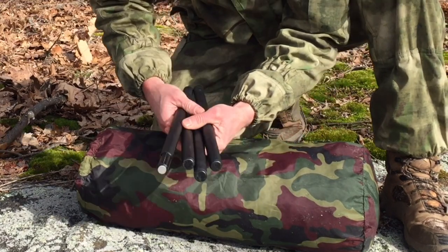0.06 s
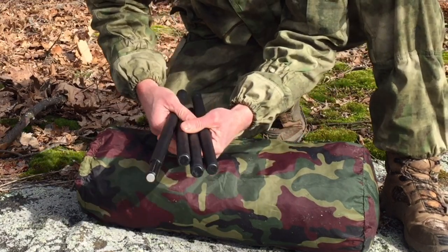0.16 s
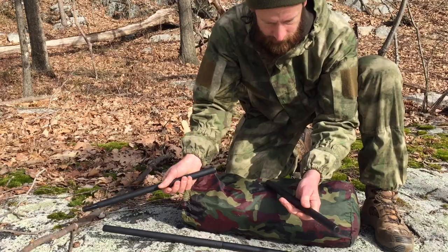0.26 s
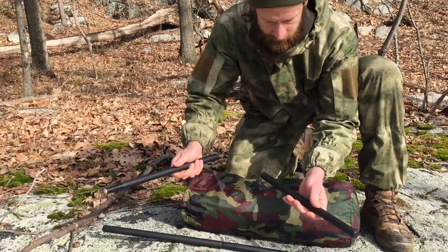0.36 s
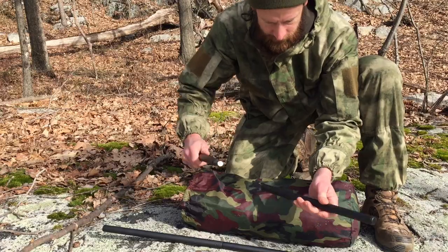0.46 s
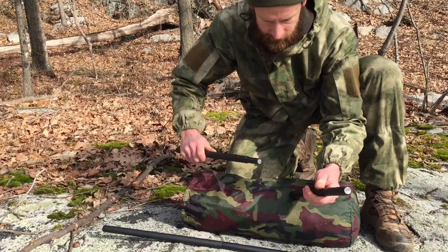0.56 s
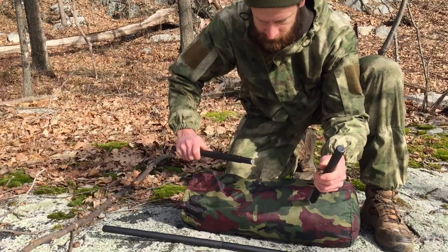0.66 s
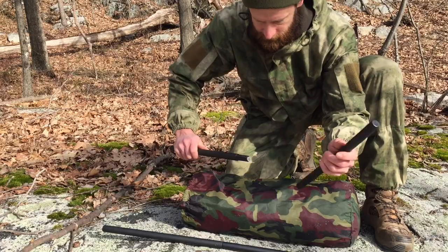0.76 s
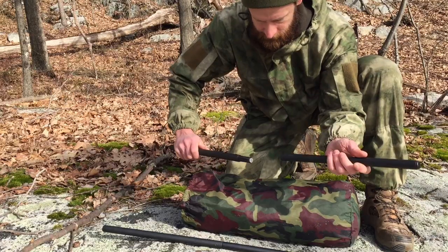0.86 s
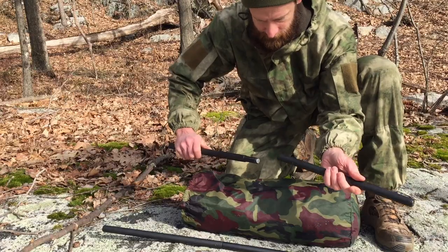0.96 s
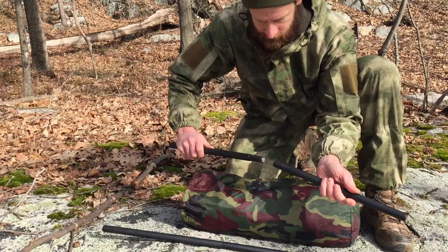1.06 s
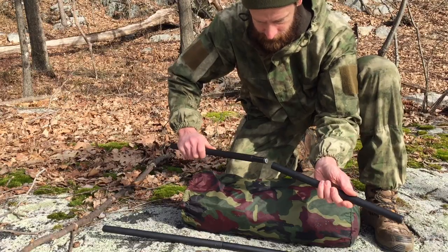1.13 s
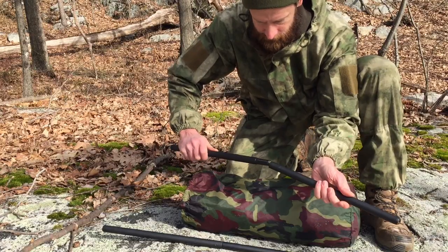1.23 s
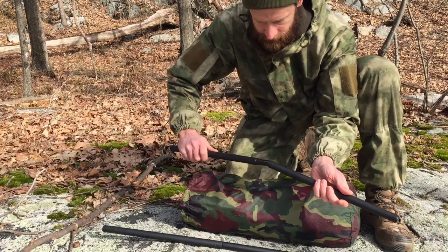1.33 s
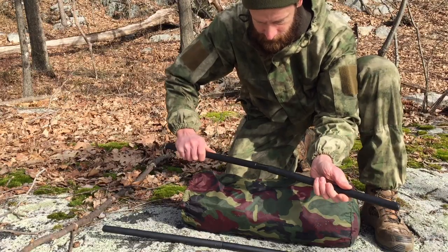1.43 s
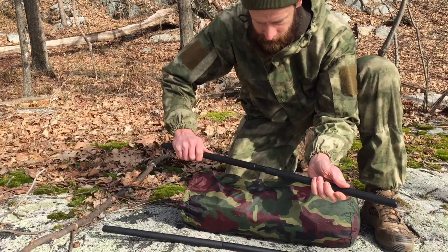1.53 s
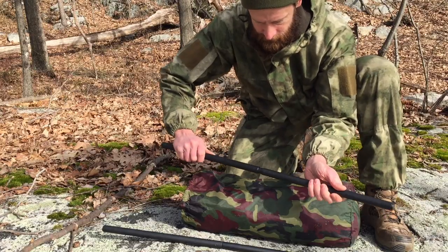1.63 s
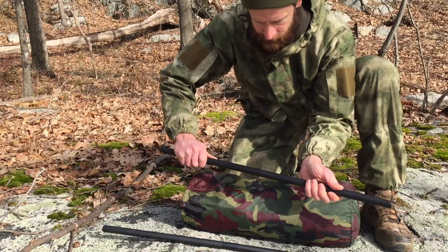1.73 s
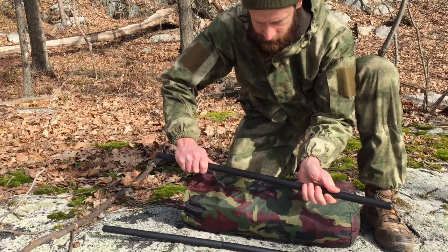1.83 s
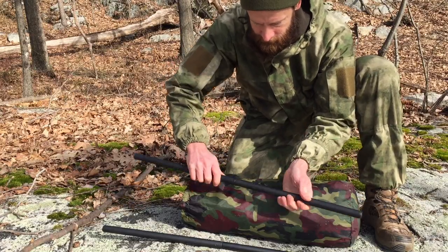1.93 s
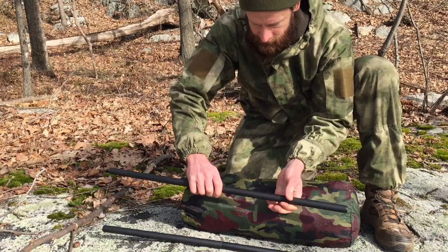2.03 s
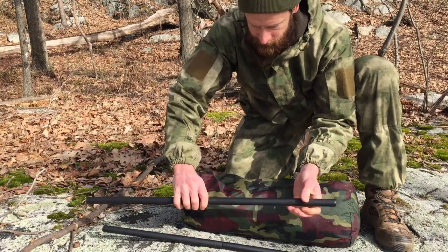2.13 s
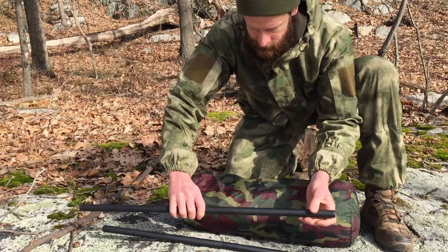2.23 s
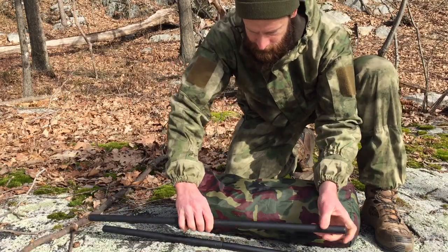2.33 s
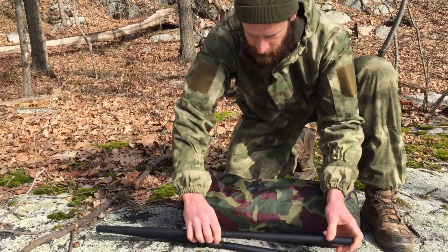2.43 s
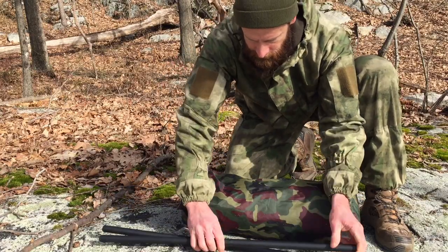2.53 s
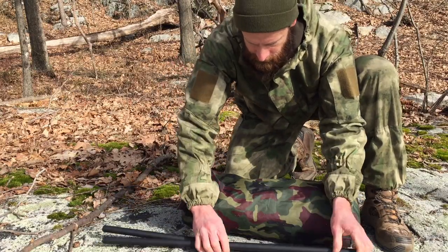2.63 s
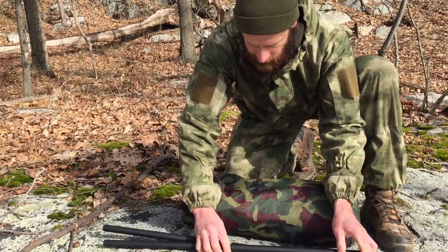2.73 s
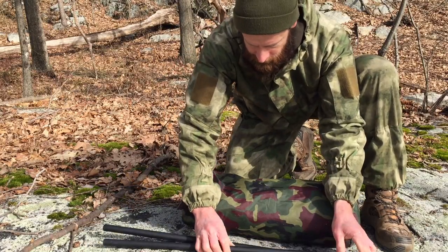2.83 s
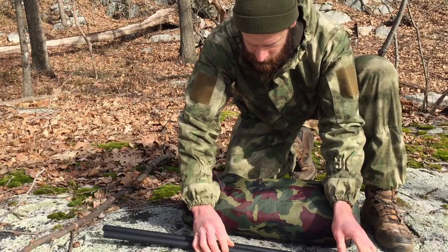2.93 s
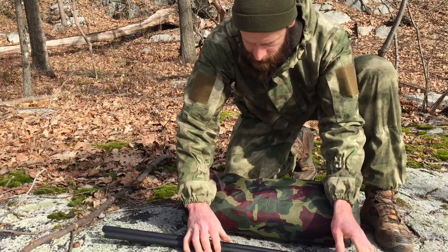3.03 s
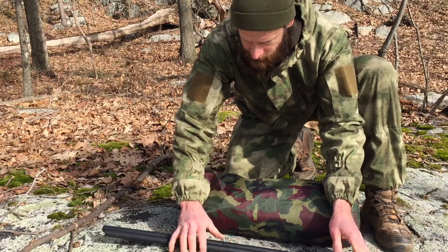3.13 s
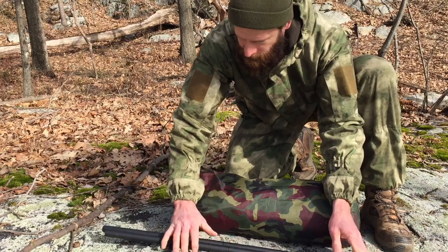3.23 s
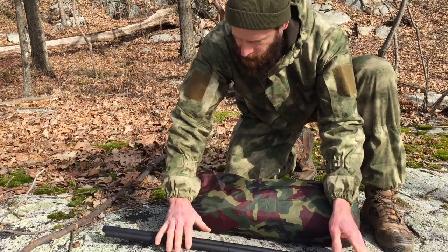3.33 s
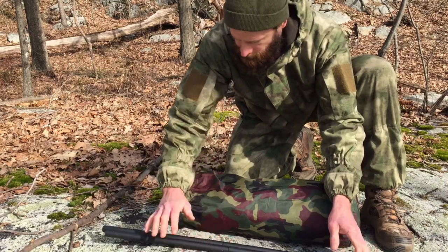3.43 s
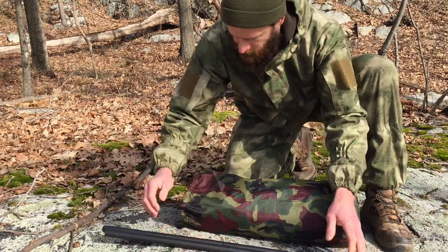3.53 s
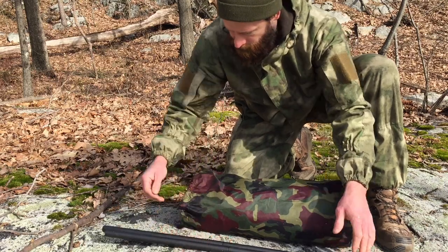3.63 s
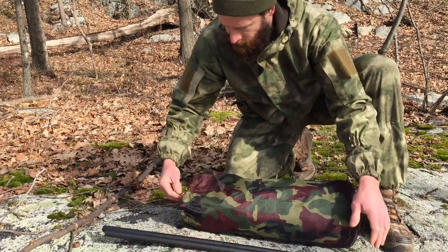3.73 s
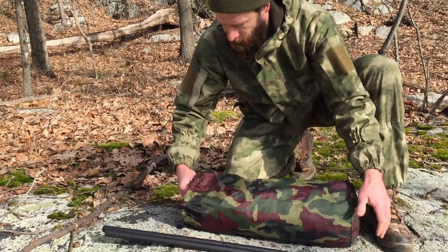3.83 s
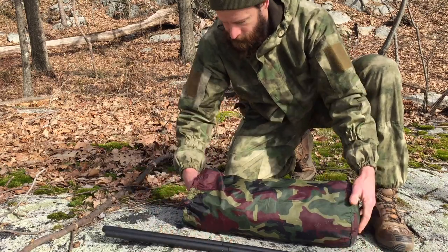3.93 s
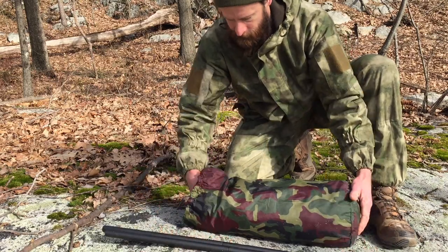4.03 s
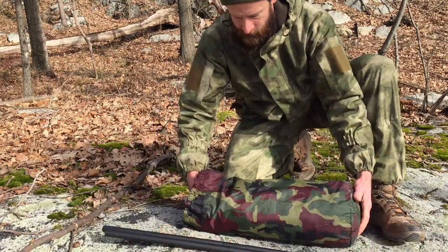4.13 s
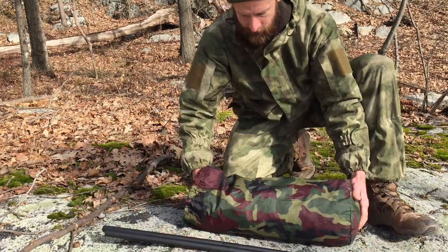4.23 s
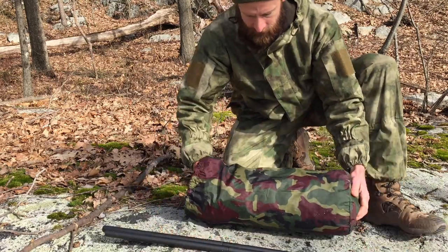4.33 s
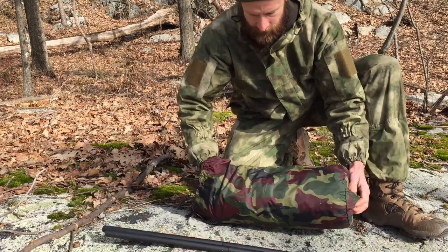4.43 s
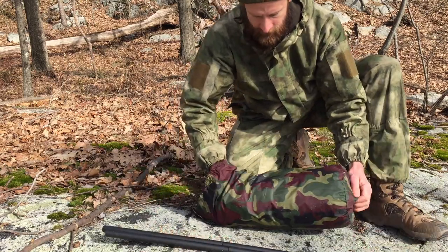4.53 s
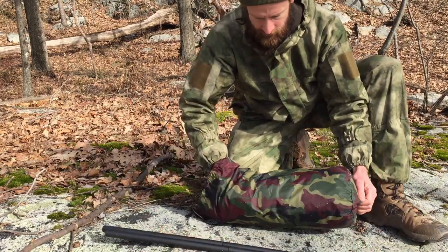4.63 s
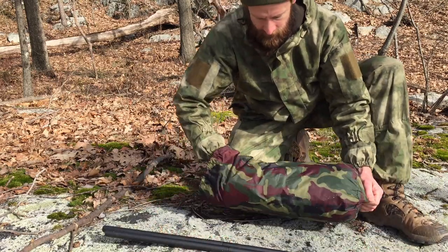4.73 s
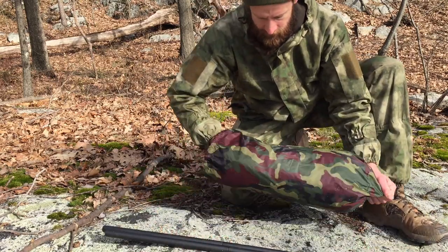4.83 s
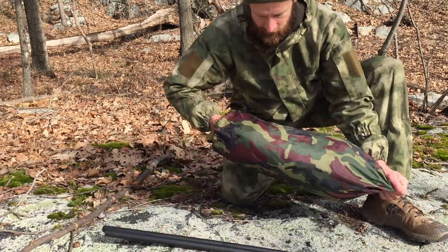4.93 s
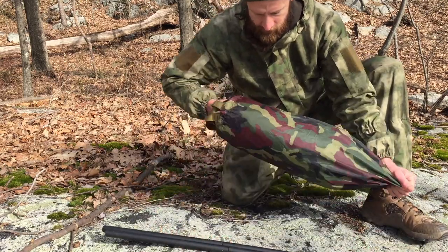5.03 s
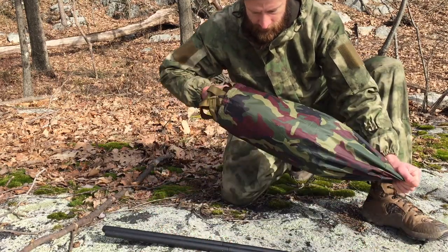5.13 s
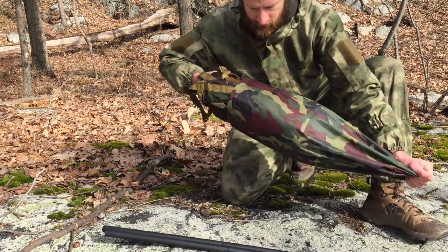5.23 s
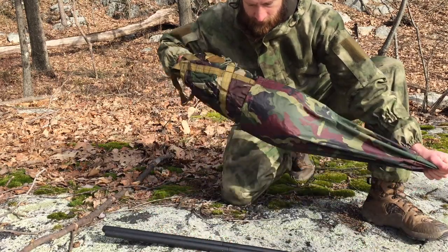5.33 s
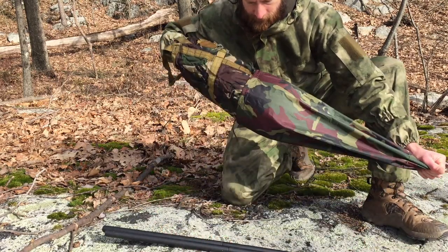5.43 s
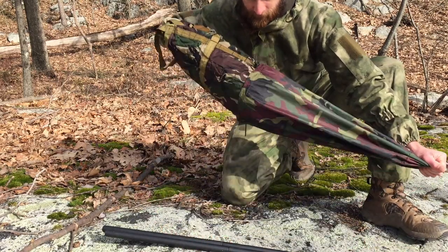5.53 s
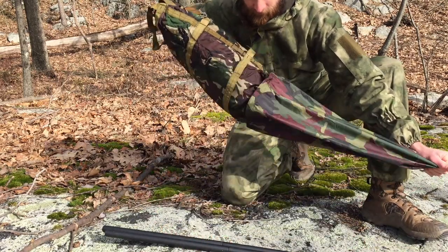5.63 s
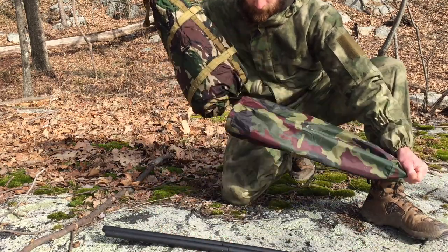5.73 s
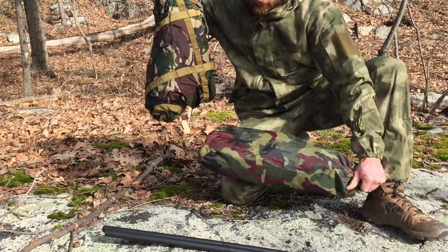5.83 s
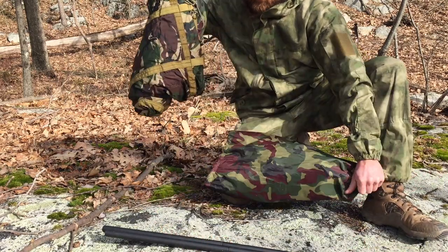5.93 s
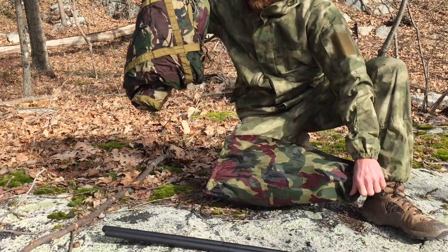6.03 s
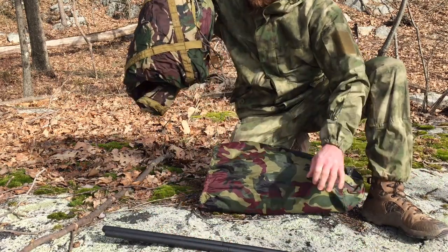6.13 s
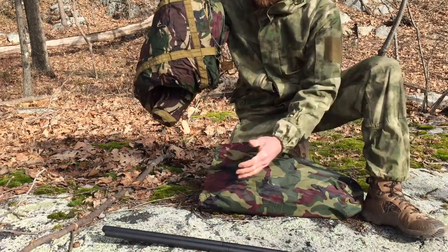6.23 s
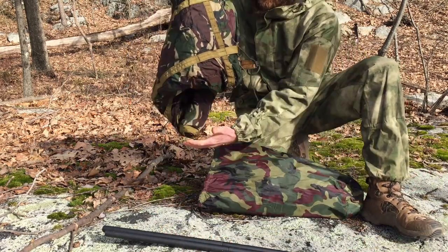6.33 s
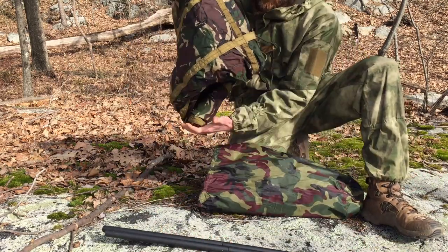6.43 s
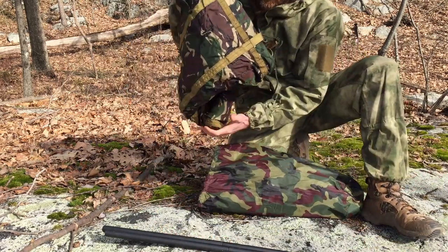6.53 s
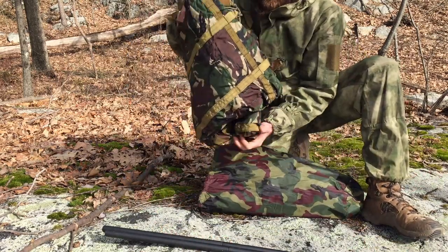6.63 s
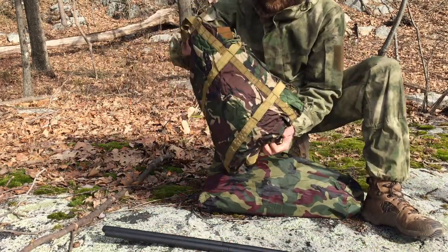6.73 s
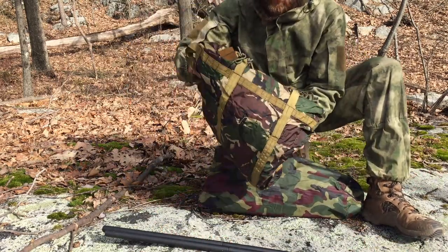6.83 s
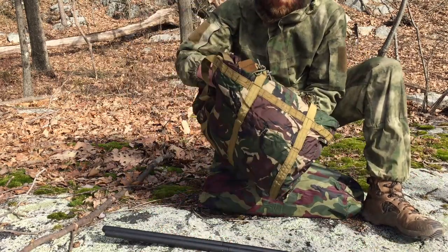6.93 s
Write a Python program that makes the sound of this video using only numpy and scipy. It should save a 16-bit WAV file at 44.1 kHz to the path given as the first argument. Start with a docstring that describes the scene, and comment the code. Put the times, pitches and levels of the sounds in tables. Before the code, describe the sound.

Close, dry clicks and scrapes of thin tubes give way to nylon rustling, a loud rasping pull and small cloth crumples.

```python
"""Outdoors on a rock slab, tent poles are gathered, slid together, snapped home and laid down.
Then hands grip a nylon stuff sack and drag a heavy hammock out of it: folds buckle and pop, the weave hisses.
Poles are damped ringing modes, struck or rubbed; cloth is many random clicks through resonances and filters.
Throughout, a low distant rumble and faint forest air lie underneath, both filtered noise.
One close microphone; the level dips briefly near the start."""
import sys
import numpy as np
from scipy import signal
from scipy.fft import rfft, irfft, next_fast_len
from scipy.io import wavfile
from scipy.ndimage import uniform_filter1d

SR = 44100
rng = np.random.default_rng(int(sys.argv[2]) if len(sys.argv) > 2 else 0)


def dump(signal):
    """Clip the signal to [-1, 1] and save it as 16-bit WAV at the path in sys.argv[1]."""
    limited = np.clip(np.atleast_2d(signal).T, -1, 1)
    pcm = np.round(limited * 32767).astype(np.int16)
    wavfile.write(sys.argv[1], SR, pcm)


N = 307377  # length in samples

# Levels in the tables are source levels, ahead of the gain and the filter in record().
# bending and wall modes of a hand-held pole, before touch and grip: pitch_hz, level_db, t60_s
POLE_MODES = [(584, -14.5, 0.038), (739, -7.5, 0.055), (890, -16.5, 0.033), (1290, -6, 0.034),
              (1614, -13, 0.029), (1823, 0.5, 0.036), (2154, -1, 0.041), (2424, 4, 0.027),
              (2760, 3.5, 0.021), (3180, -15, 0.057), (4013, 4, 0.034), (4310, -2, 0.035), (5850, -26, .02),
              (6250, -7.5, 0.032), (8200, -32, .03), (9310, -13.5, 0.086)]
# poles knocking: start_s, level_db, bass_db, treble_db, ring (share of t60), focus_hz, focus_db
POLE_KNOCKS = [(0.1383, -22, -0.5, -8.5, 1.03, 4170, 1.5), (.148, -29, 7, -17, 1.1, 1790, 14),
               (.163, -42, 3, -14, 2, 1800, 5), (1.3822, -26.5, -23.5, -16, 0.56, 1260, 11),
               (1.417, -47, 7, -14, 1.1, 2500, -5), (1.431, -40, 0, -25, 0.73, 1250, 17),
               (1.543, -43.5, -15, -41, 0.84, 1290, 10), (1.8123, -22, -37, 18, 0.23, 5800, 16.5),
               (1.8137, -16, -6.5, -13, 0.56, 1700, 11.5), (2.835, -49.5, 0, -7, 0.8, 950, 45),
               (3.0988, -28, 6.5, -6, 0.74, 790, 12), (3.143, -30.5, 20, 0, 0.66, 2280, 12),
               (3.346, -48, -7, 6, 1, 3150, 23)]
# poles scraping: start_s, end_s, start_db, end_db, bass_db, treble_db, grit_db (against the ringing tube),
# focus_hz, focus_db
POLE_SCRAPES = [(0, 0.105, -39.5, -52, 14, -45, 2.5, 1490, 14),
                (0.096, 0.14, -35, -43.5, 16, -5, 5, 1440, 18.5),
                (0.156, 0.274, -37, -55, 8, -36, -1.5, 1730, 11.5),
                (0.657, 0.709, -31.5, -44.5, 4.5, 6, 3.5, 620, 11),
                (0.712, 0.771, -47, -36.5, 3, 2.5, 3.5, 1380, 0),
                (0.77, 0.89, -52.5, -62, 13, 4, 11, 1500, 10),
                (1.597, 1.617, -55, -55, -10, 2, -5, 4000, 2),
                (1.654, 1.671, -46, -50.5, -1, -2, -3, 2200, 12),
                (1.691, 1.724, -56, -35, -36, -10, 6, 3260, -4),
                (1.737, 1.758, -42, -35, -23, -1, -4, 2980, -4),
                (1.766, 1.778, -33, -32, -24, -3, 2, 2600, 2),
                (1.782, 1.809, -34, -27.5, -14, -3, 9, 2800, 0),
                (1.965, 1.999, -61, -42, -27, 5, 16, 13000, 8),
                (2, 2.149, -40, -50.5, -27, 27, 5.5, 12400, 6),
                (2.185, 2.323, -59, -50.5, -4, 26, 10, 12500, 0),
                (3.085, 3.103, -60, -33, -2, 9, -5, 990, 7), (3.107, 3.2, -51, -57.5, 14, 4, -3, 2200, 6),
                (3.242, 3.268, -50.5, -46, 19, 4, 2, 1140, 21)]
# single modes of a pole singing under friction: start_s, end_s, pitch_hz, level_db
POLE_SQUEALS = [(1.81, 1.898, 2000, -50.5), (1.99, 2.047, 2760, -51.5), (1.98, 2.136, 6280, -53),
                (2.046, 2.154, 4080, -50.5), (2.089, 2.151, 2350, -54), (2.195, 2.344, 9220, -43.5),
                (2.2, 2.32, 1990, -62), (2.93, 2.985, 554, -57.5), (3.104, 3.213, 544, -54.5),
                (3.27, 3.336, 630, -57.5)]
# spectrum of rough metal contact, before the touch: frequency_hz, level_db
GRIT_SPECTRUM = [(250, -29.5), (450, -13), (680, -5.5), (930, -5.5), (1350, -3.5), (3000, -1), (4300, -5.5),
                 (5200, -15.5), (6500, -11), (7800, -20), (9300, -8), (10500, -17.5), (13000, -15),
                 (16000, -29.5)]

# hand moves on sleeve and sack: start_s, length_s, folds_db (buckling), weave_db (sliding), bulk_db (flapping);
# cloth() then balances the three layers
HAND_STROKES = [(2.308, 0.16, -62.5, -62.5, -69), (2.449, 0.21, -60.5, -60, -68),
                (2.728, 0.044, -62, -67, -57.5), (3.642, 0.091, -57.5, -60, -64),
                (3.746, 0.24, -58, -58.5, -71), (3.865, 0.2, -46.5, -48.5, -54),
                (4.03, 0.1, -44.5, -47.5, -46), (4.098, 0.18, -51, -53, -56.5),
                (4.254, 0.14, -42, -49, -54.5), (4.407, 0.095, -43.5, -58, -49.5),
                (4.478, 0.089, -39, -51.5, -46.5), (4.576, 0.047, -39, -44.5, -48.5),
                (4.616, 0.22, -43.5, -59.5, -53.5), (5.747, .12, -51, -63, -67),
                (5.884, 0.078, -40.5, -52.5, -48), (5.988, 0.039, -43, -50.5, -47.5),
                (6.042, 0.097, -47, -54.5, -57.5), (6.147, .11, -54, -58, -61),
                (6.261, 0.046, -42, -54, -52.5), (6.327, .09, -47.5, -50.5, -53),
                (6.428, 0.063, -62, -51.5, -63), (6.501, 0.049, -47, -46.5, -59),
                (6.595, 0.16, -58, -58.5, -61), (6.735, 0.11, -54.5, -54.5, -55.5),
                (6.81, .11, -53, -50.5, -59)]
# speed of the hammock sliding out of the sack, before easing: time_s, speed_db
PULL_SPEED = [(4.83, -57), (4.895, -37), (4.99, -40), (5.28, -38), (5.4, -28), (5.462, -31), (5.556, -41.5),
              (5.615, -34), (5.675, -37), (5.71, -29.5), (5.75, -38.5), (5.8, -61)]
# spectra of the folds, the weave, its rasp when pulled hard, and the bulk: frequency_hz, level_db
FOLD_SPECTRUM = [(300, -7.5), (480, -13), (620, -3), (1050, 3), (1500, -0.5), (2300, -0.5), (3000, -7),
                 (4200, -15.5), (6000, -20.5)]
WEAVE_SPECTRUM = [(900, -9), (2200, -1), (4000, 0.5), (5000, -4), (6300, 0), (7600, -3), (9200, 1),
                  (10400, -4.5), (12300, 0), (14000, -3.5), (16000, -5.5)]
RASP_SPECTRUM = [(700, -48), (1100, 0.5), (2300, 2), (3000, 4), (4200, 2.5), (5000, -9), (6200, -2.5),
                 (7500, -7), (9000, -13), (12000, -73)]
BULK_SPECTRUM = [(70, -11), (140, -2.5), (330, 0.5), (460, -4), (700, -3), (1200, -43)]
# large creases popping: start_s, level_db, pitch_hz, treble_db (tick against panel)
CREASE_POPS = [(4.077, -36, 890, -14), (4.399, -38, 2300, -13), (4.47, -33.5, 1290, -12),
               (4.4939, -30.5, 1500, -2), (4.538, -32, 1470, -8), (4.576, -31.5, 2900, -14),
               (4.597, -35, 684, -14), (4.956, -28.5, 2350, -11), (5.072, -27, 2040, -18),
               (5.102, -29, 2200, -9), (5.155, -31.5, 2860, 2), (5.22, -33, 2130, -2),
               (5.256, -28, 2570, -6), (5.31, -31.5, 1490, -13), (5.408, -20, 2540, -15),
               (5.69, -20.5, 2470, -9), (5.693, -20.5, 2030, -9), (5.756, -30, 1620, -19),
               (5.861, -40, 1490, -24), (5.88, -39, 2680, -21), (5.929, -30, 1290, -26),
               (6.021, -44, 1200, 9), (6.106, -39, 1420, -20), (6.0859, -26.5, 1240, -6),
               (6.176, -36, 2280, -26), (6.28, -50, 1310, -14), (6.5309, -33, 1490, 6)]
# the soft bundle bumping: start_s, level_db, pitch_hz, thud_db (half the deep thud's amplitude)
BUNDLE_THUMPS = [(4.079, -43.5, 325, -43), (4.51, -46, 249, -40), (4.598, -39, 558, -36.5),
                 (4.898, -35, 257, -42.5), (5.34, -39, 216, -44), (5.67, -41, 197, -37),
                 (5.938, -33, 277, -47), (6.532, -34, 185, -46.5)]
# one taut panel rubbing over another: start_s, end_s, start_hz, end_hz, level_db
PANEL_RUBS = [(3.664, 3.743, 947, 880, -55), (3.884, 3.989, 1195, 900, -50), (4.332, 4.431, 687, 556, -44),
              (4.5, 4.636, 520, 600, -45.5), (5.774, 5.836, 1153, 896, -43.5),
              (5.845, 5.913, 1502, 897, -43), (5.899, 5.968, 1298, 1590, -35), (5.96, 6.05, 515, 459, -52),
              (6.271, 6.366, 857, 694, -59), (6.45, 6.549, 1080, 1366, -50)]
# a palm skimming over smooth nylon: start_s, length_s, level_db
PALM_SKIMS = [(3.87, 0.27, -55), (4.57, 0.053, -56), (6.36, 0.17, -52)]

# distant rumble: frequency_hz, level_db; then its course before wavering: time_s, level_db
RUMBLE_SPECTRUM = [(22, -40), (40, -15), (60, -7.5), (71, 0.5), (82, -6.5), (120, -9.5), (180, -17),
                   (260, -22.5), (450, -38)]
RUMBLE_COURSE = [(0, -48.5), (3.35, -49.5), (3.6, -50), (4.4, -50.5), (5.95, -46), (6.15, -54), (6.97, -52)]
# forest air: frequency_hz, level_db
AIR_SPECTRUM = [(100, 2), (400, -1.5), (800, -2), (1600, -2.5), (3000, -3.5), (5000, -8.5), (9000, -11),
                (15500, -17)]
# the level dips briefly; the last gain holds to the end: time_s, gain_db
LEVEL_DIP = [(0, -1.5), (.19, -4.5), (.25, -15.5), (.28, -43), (.31, -25), (.35, -11.5), (.41, -3.5)]

# folds grow with the pull's speed, the bulk with its square root
PULL_FOLDS_DB, PULL_BULK_DB = 0.5, -28
PULL_EASE_S = 0.027  # the heavy bundle cannot change speed at once
# harder crumpling makes smaller, higher folds: their pitch at a reference level, and its rise
FOLD_HZ, FOLD_REFERENCE_DB, FOLD_OCTAVES_PER_DB = 1450, -46.5, 3.5
# a stroke swells over this share of its length, holds, and dies away with this time constant
STROKE_SWELL_SHARE, STROKE_FADE_S = 0.54, 0.047
AIR_DB = -58.5  # forest air, before its slow wander
TOP_HZ = 15900  # edge of the steep treble cut


def knocks(crack_db=-6, tail_db=-33, crack_s=.0019, tail_s=0.071, lowest_hz=520):
    """Each knock is a brief crack and the ringing of the tube; the trees scatter a faint tail."""
    out = np.zeros(N)
    for start_s, level_db, bass_db, treble_db, ring, focus_hz, focus_db in POLE_KNOCKS:
        touch = bass_db, treble_db, focus_hz, focus_db
        tube = pole_ring(touch, ring)
        t = np.arange(len(tube)) / SR
        rough = grit(rng.standard_normal(len(t)), touch)
        crack = blow(rough * np.exp(-t / crack_s), crack_db)
        tail = blow(rough * np.exp(-t / tail_s), tail_db)
        add(out, start_s, blow(blow(tube, 0) + crack + tail, level_db))
    # a thin tube radiates little bass
    return signal.sosfilt(signal.butter(4, lowest_hz, "high", fs=SR, output="sos"), out)


def scrapes(ring=0.63, chatter_db=2, edge_s=0.0043):
    """Tube slides on tube or through the hand: dense slips hiss and ring the pole."""
    out = np.zeros(N)
    friction = slips(9000, 1.4) * undb(chatter_db * walk(170))
    for (start_s, end_s, start_db, end_db, bass_db, treble_db, grit_db,
         focus_hz, focus_db) in POLE_SCRAPES:
        touch = bass_db, treble_db, focus_hz, focus_db
        length_s = end_s - start_s
        t = np.arange(int((max(length_s, 0) + 10 * edge_s) * SR)) / SR
        rub = friction[max(int(start_s * SR), 0):][:len(t)]
        tube = unit(signal.fftconvolve(rub, pole_ring(touch, ring))[:len(t)])
        scrape = unit(tube + undb(grit_db) * grit(rub, touch))
        onset = 1 - np.exp(-2 * t / edge_s)
        pressure = undb(np.interp(t, [0, length_s], [start_db, end_db])) * onset
        release = np.exp(-np.maximum(t - length_s, 0) / edge_s)
        add(out, start_s, scrape * pressure * release)
    return out


def squeals(width_hz=80, width_share=0.017):
    """As the grip shifts, friction feeds one mode after another."""
    out, friction = np.zeros(N), rng.standard_normal(N)
    for start_s, end_s, pitch_hz, level_db in POLE_SQUEALS:
        rub = friction[int(start_s * SR):][:int(max(end_s - start_s, .01) * SR)]
        width = width_hz + width_share * pitch_hz
        tone = unit(resonate(resonate(rub, pitch_hz, width), pitch_hz, 2 * width))
        add(out, start_s, undb(level_db) * tone * signal.windows.tukey(len(rub), .5))
    return out


def pole_ring(touch, ring, scatter_db=4.0):
    """A pole's answer to one touch; the grip damps the modes and detunes them slightly."""
    t = np.arange(SR // 4) / SR
    hz, db, t60 = np.transpose(POLE_MODES)
    db = db + contact(hz, *touch) + scatter_db * rng.standard_normal(len(hz))
    hz = hz * (1 + .008 * rng.standard_normal(len(hz)))
    # each mode falls 60 dB in its t60 times the ring share
    decay = np.exp(-np.log(1000) * np.outer(1 / (t60 * max(ring, .1)), t))
    modes = np.sin(2 * np.pi * np.outer(hz, t)) * decay
    signs = rng.choice([-1, 1], len(hz))
    return (signs * undb(db)) @ modes


def grit(x, touch):
    """The rough, unpitched part of a contact."""
    hz, db = np.transpose(GRIT_SPECTRUM)
    return colour(x, np.transpose([hz, db + contact(hz, *touch)]))


def contact(hz, bass_db, treble_db, focus_hz, focus_db):
    """How the place and hardness of a touch weight each frequency, in dB."""
    bass = bass_db / (1 + (hz / 1150) ** 4)
    treble = treble_db / (1 + (5200 / hz) ** 4)
    return bass + treble + focus_db * bump(hz, focus_hz, octaves=0.17)


def cloth(folds_db=4, weave_db=3.0, bulk_db=3.5, rasp_db=8, crackle_db=-5, taut_db=-38, merge_db=-49):
    """Nylon crumples in separate folds while its weave hisses; pulled taut, it rasps."""
    folds, weave, bulk = motion()
    folds_above_db = 20 * np.log10(folds) - FOLD_REFERENCE_DB
    fold_hz = FOLD_HZ * 2 ** (FOLD_OCTAVES_PER_DB * folds_above_db)
    taut = weave / (weave + undb(taut_db))
    jerk = undb(0.9 * walk(55))
    slack = colour(buckling(2600, 3.8, 10.0, fold_hz), FOLD_SPECTRUM)
    # once the cloth slides, the folds merge into a dense rush
    merged = weave / (weave + undb(merge_db))
    rush = colour(slips(7500, 3.6), FOLD_SPECTRUM)
    crumple = np.sqrt(1 - merged) * slack + np.sqrt(merged) * rush
    # slack cloth also gives small, lone crease pops
    crackle = (1 - merged) * colour(buckling(140, 4.7, 3.4, fold_hz), FOLD_SPECTRUM)
    hiss = colour(slips(16000, 4.0), WEAVE_SPECTRUM)
    rasp = colour(slips(11000, 3.7), RASP_SPECTRUM) * taut
    flap = colour(slips(600, 3.8), BULK_SPECTRUM)
    creasing = folds * (undb(folds_db) * crumple + undb(crackle_db) * crackle)
    sliding = weave * (undb(weave_db) * hiss + undb(rasp_db) * rasp)
    return jerk * (creasing + sliding) + undb(bulk_db) * bulk * flap


def motion():
    """Strength of folds, weave and bulk: the hand strokes and the long pull add up in power."""
    time_s, speed_db = np.transpose(PULL_SPEED)
    speed = undb(np.interp(np.arange(N) / SR, time_s, speed_db, left=-120, right=-120))
    speed = np.abs(uniform_filter1d(speed, int(PULL_EASE_S * SR)))
    pull = np.array([undb(PULL_FOLDS_DB) * speed, speed, undb(PULL_BULK_DB) * np.sqrt(speed)])
    shapes = np.array([stroke(start_s, length_s) for start_s, length_s, *_ in HAND_STROKES])
    strengths = undb(np.array(HAND_STROKES)[:, 2:].T)
    return np.sqrt(pull ** 2 + strengths ** 2 @ shapes ** 2)


def stroke(start_s, length_s):
    """One stroke: the hand gathers speed, holds it and comes to rest."""
    t = np.arange(N) / SR - start_s
    swell = np.sin(np.pi / 2 * np.clip(t / (STROKE_SWELL_SHARE * length_s), 0, 1)) ** 2
    return swell * np.exp(-np.clip((t - length_s) / STROKE_FADE_S, 0, 20))


def buckling(per_s, spread_db, cycles, fold_hz, focus_db=4, count=16):
    """Small folds flip over, each ringing a few cycles; one size prevails, and the others come and go."""
    out = np.zeros(N)
    for hz in np.geomspace(450, 5000, count):
        shifting_db = 3 * walk(22)
        # the prevailing size is updated every 100 samples
        share = undb(focus_db * bump(hz, fold_hz[::100], octaves=.4)).repeat(100)[:N]
        flips = slips(per_s / count, spread_db) * share * undb(shifting_db)
        out += resonate(flips, hz, hz / cycles)
    return out


def pops(snap_s=0.0027, flutter_db=-21, flutter_s=0.024, cycles=2.36, tick_hz=4500):
    """A big crease snaps through, flutters briefly and sounds the panel around it."""
    out, t = np.zeros(N), np.arange(SR // 16) / SR
    envelope = np.exp(-t / snap_s) + undb(flutter_db) * np.exp(-t / flutter_s)
    tick_width = 0.72 * tick_hz
    for start_s, level_db, pitch_hz, treble_db in CREASE_POPS:
        snap = rng.standard_normal(len(t)) * envelope
        width = pitch_hz / cycles
        panel = resonate(resonate(snap, pitch_hz, width), pitch_hz, 2 * width)
        tick = resonate(resonate(snap, tick_hz, tick_width), tick_hz, tick_width)
        add(out, start_s, blow(unit(panel) + undb(treble_db) * unit(tick), level_db))
    return out


def thumps(decay_s=0.012, scuff_db=-5, thud_hz=76, thud_s=0.053):
    """The packed cloth lands with a dull, quickly damped push; its weight gives a deep thud."""
    out, t = np.zeros(N), np.arange(SR // 4) / SR
    onset = 1 - np.exp(-t / 0.0032)
    thud = np.sin(2 * np.pi * thud_hz * t) * np.exp(-t / thud_s)
    for start_s, level_db, pitch_hz, thud_db in BUNDLE_THUMPS:
        scuff = undb(scuff_db) * colour(rng.standard_normal(len(t)), BULK_SPECTRUM)
        push = (np.sin(2 * np.pi * pitch_hz * t) + scuff) * np.exp(-t / decay_s)
        add(out, start_s, blow(push * onset, level_db) + 2 * undb(thud_db) * thud * onset)
    return out


def rubs(flutter_per_s=260):
    """A rubbed panel sounds a hollow band whose pitch follows its changing tension."""
    out = np.zeros(N)
    # a randomly turning complex amplitude widens the gliding tone into a band
    shiver = walk(flutter_per_s) + 1j * walk(flutter_per_s)
    for start_s, end_s, start_hz, end_hz, level_db in PANEL_RUBS:
        part = shiver[int(start_s * SR):][:int(max(end_s - start_s, .01) * SR)]
        phase = 2 * np.pi * np.cumsum(np.geomspace(start_hz, end_hz, len(part))) / SR
        band = np.real(part * np.exp(1j * phase))
        add(out, start_s, undb(level_db) * band * signal.windows.tukey(len(part), .5))
    return out


def skims(hz=13000, width_hz=4500, grain_db=2):
    """Skin brushes across the fine threads: a thin, very high hiss."""
    threads = unit(resonate(resonate(slips(16000, grain_db), hz, width_hz), hz, width_hz))
    palm = sum(undb(level_db) * stroke(start_s, length_s) for start_s, length_s, level_db in PALM_SKIMS)
    return threads * palm


def outdoors(waver_db=3.0, waver_per_s=11):
    """A wavering far rumble under smooth forest air."""
    course_db = np.interp(np.arange(N) / SR, *np.transpose(RUMBLE_COURSE))
    rumble_db = course_db + waver_db * walk(waver_per_s)
    rumble = colour(rng.standard_normal(N), RUMBLE_SPECTRUM) * undb(rumble_db)
    air = colour(rng.standard_normal(N), AIR_SPECTRUM) * undb(AIR_DB + 1.4 * walk(2.02))
    return rumble + air


def slips(per_s, spread_db):
    """Tiny stick-slip clicks of unequal size at random moments."""
    chance = rng.random(N) * SR / per_s
    hit, out = chance < 1, np.zeros(N)
    size = np.minimum(-np.log(chance[hit] + 1e-9), 4)  # few are large
    out[hit] = np.sign(rng.random(N)[hit] - .5) * undb(spread_db * size)
    return out


def walk(rate):
    """Random wander through `rate` new values a second; rms 1."""
    knots = rng.standard_normal(4096)
    return unit(np.interp(np.arange(N) / SR * rate, np.arange(len(knots)), knots))


def colour(x, points):
    """Filter by a spectrum of (Hz, dB) points, falling off beyond both ends; rms 1."""
    hz, db = np.transpose(points)
    size = next_fast_len(len(x))
    f = np.maximum(np.arange(size // 2 + 1) * SR / size, 1)
    skirts = np.minimum(f / hz[0], 1) ** 2 * np.minimum(hz[-1] / f, 1) ** 2
    gain = undb(np.interp(np.log(f), np.log(hz), db)) * skirts
    return unit(irfft(rfft(x, size) * gain, size)[:len(x)])


def resonate(x, hz, width_hz):
    """One resonance, gain 1 at its centre."""
    return signal.lfilter(*signal.iirpeak(hz, hz / width_hz, fs=SR), x)


def bump(hz, centre_hz, octaves):
    """A bell on the pitch axis, 1 at its centre."""
    return np.exp(-.5 * (np.log2(hz / centre_hz) / octaves) ** 2)


def undb(db):
    """Decibels to gain."""
    return 10 ** (np.asarray(db) / 20)


def unit(x):
    """Scale to rms 1."""
    return x / np.sqrt(np.mean(x ** 2) + 1e-20)


def blow(x, db):
    """Set the rms level of a hit over its first hundredth of a second."""
    return x * undb(db) / np.sqrt(np.mean(x[:SR // 100] ** 2))


def add(out, start_s, x):
    """Mix a sound in at its start time."""
    i = max(int(start_s * SR), 0)
    out[i:i + len(x)] += x[:N - i]


def scene():
    """Poles, sack and the outdoors around them; both channels hear the same."""
    poles = knocks() + scrapes() + squeals()
    sack = cloth() + pops() + thumps() + rubs() + skims()
    mono = poles + sack + outdoors()
    return np.array([mono, mono])


def record(dry):
    """The level dips once near the start; the top is cut steeply."""
    gain = undb(np.interp(np.arange(N) / SR, *np.transpose(LEVEL_DIP)))
    return signal.sosfilt(signal.ellip(10, .2, 80, TOP_HZ, fs=SR, output="sos"), dry * gain)


dry = scene()
out = record(dry)
dump(out)
```